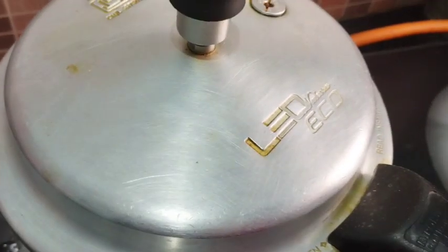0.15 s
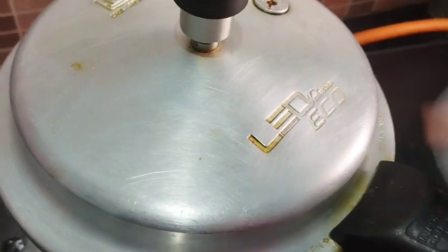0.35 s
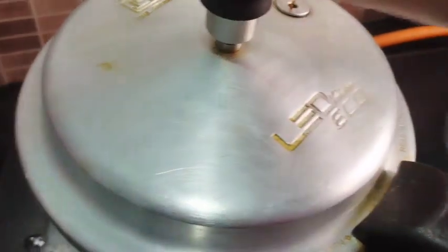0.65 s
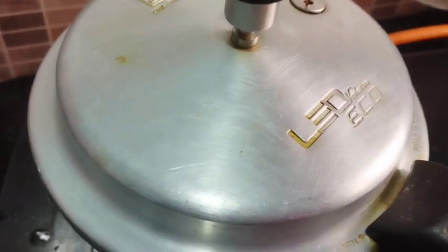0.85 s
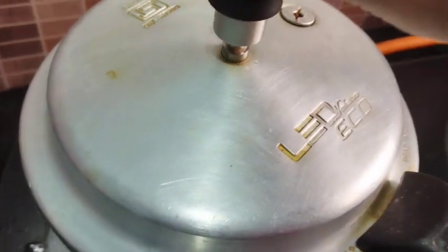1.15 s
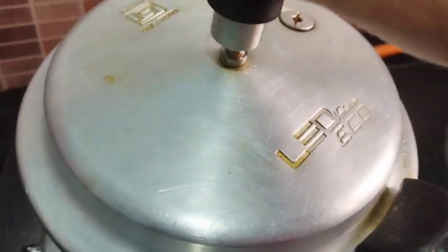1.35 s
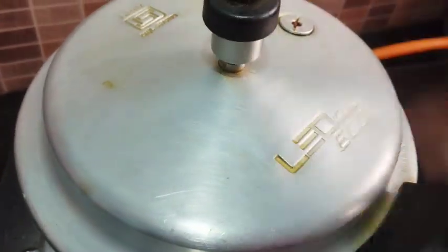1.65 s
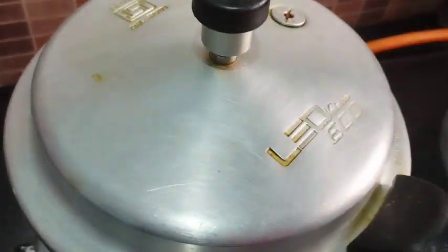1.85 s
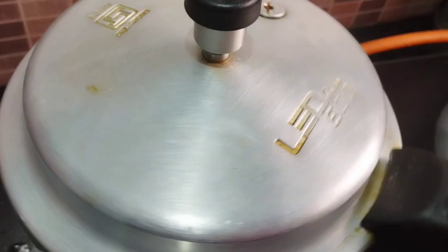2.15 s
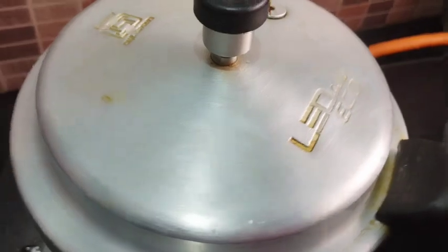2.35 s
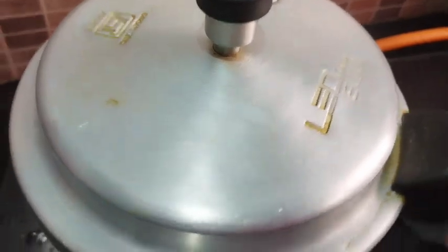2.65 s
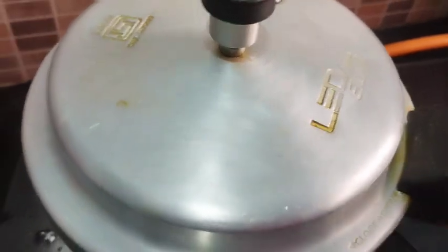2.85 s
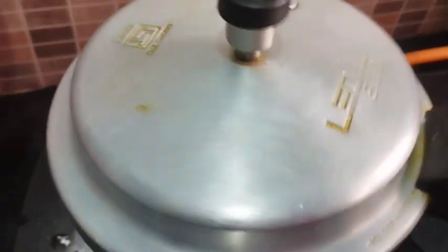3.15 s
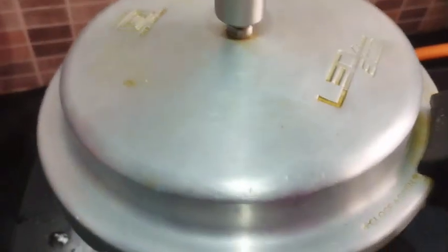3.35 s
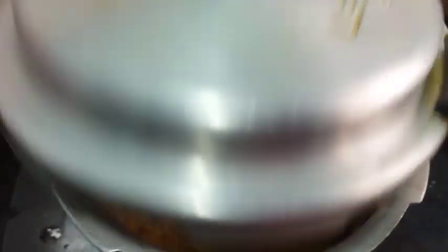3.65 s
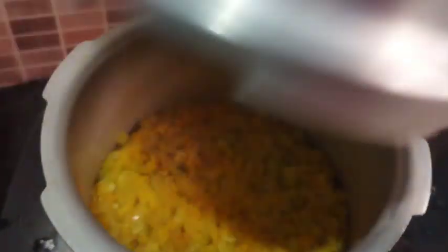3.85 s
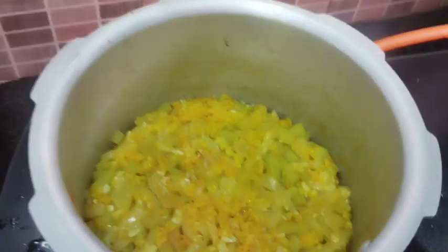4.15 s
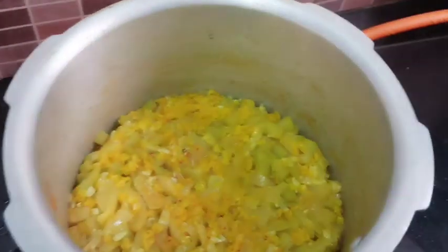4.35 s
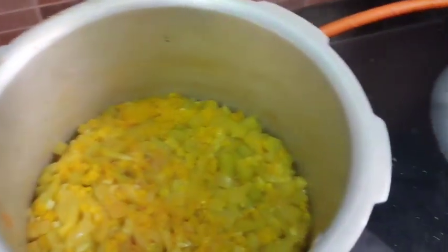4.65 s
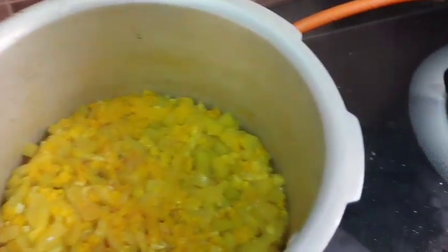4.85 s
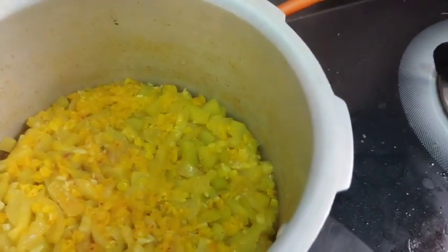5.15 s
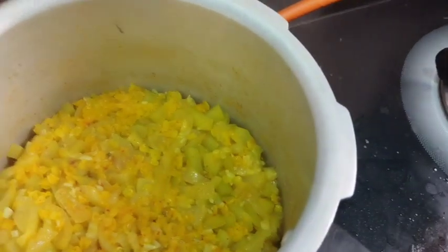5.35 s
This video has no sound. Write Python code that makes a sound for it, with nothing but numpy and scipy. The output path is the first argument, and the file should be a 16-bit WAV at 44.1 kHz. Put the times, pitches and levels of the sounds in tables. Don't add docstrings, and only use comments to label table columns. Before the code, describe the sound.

Close to a pressure cooker in a small tiled kitchen. Near silence, a metallic tick, then a fierce bright hiss of steam that quickly fades and ends in a clink and puff as the weight drops. A quiet gap, then the lid is twisted: ticks, a very loud clanging bang with a low thump, short rubbery groans and more knocks. After it lifts off, only tiny ticks and soft spoon clinks remain. Phone-like sound, slightly clipped.

```python
import sys
import numpy as np
from scipy import signal
from scipy.fft import rfft, irfft
from scipy.io import wavfile
from scipy.ndimage import uniform_filter1d

SR = 44100
rng = np.random.default_rng(int(sys.argv[2]) if len(sys.argv) > 2 else 0)


def master_out(mix):
    frames = np.transpose(np.atleast_2d(mix))
    ceiling = np.clip(frames, -1, 1)
    pcm = np.round(ceiling * 32767).astype(np.int16)
    wavfile.write(sys.argv[1], SR, pcm)


def voltage_ratio(decibels):
    exponent = np.asarray(decibels, float) / 20
    return 10 ** exponent


N = 242991
T = np.arange(N) / SR


def unit(x):
    return x / np.sqrt(np.mean(x ** 2))


def coloured(spectrum):
    hz, db = np.transpose(spectrum)
    f = np.maximum(np.fft.rfftfreq(N, 1 / SR), 1)
    gain = voltage_ratio(np.interp(np.log(f), np.log(hz), db))
    return unit(irfft(rfft(rng.standard_normal(N)) * gain, N))


def band(x, lo_hz, hi_hz):
    sos = signal.butter(2, [lo_hz, min(hi_hz, .45 * SR)], "bandpass", fs=SR, output="sos")
    return signal.sosfilt(sos, x)


def noise_band(lo_hz, hi_hz):
    return unit(band(rng.standard_normal(N), lo_hz, hi_hz))


def walk(rate_hz):
    k = int(SR / rate_hz)
    held = np.repeat(rng.standard_normal(N // k + 1), k)
    return unit(uniform_filter1d(uniform_filter1d(held, k), k)[:N])


def gain_curve(s, db):
    edge = np.clip(np.minimum(T - s[0], s[-1] - T) / .006, 0, 1)
    return voltage_ratio(np.interp(T, s, db)) * edge


def swell(s, rise_s, hold_s, fall_s, db, sag_db=0):
    depth_db = 23
    times = s + np.cumsum([0, rise_s, hold_s, fall_s])
    return gain_curve(times, db - np.array([depth_db, 0, sag_db, sag_db + depth_db]))


def add(out, s, db, t60, hz=None, rise_s=.0003):
    i = int(s * SR)
    t = T[:min(int(1.2 * t60 * SR) + 8, N - i)]
    shape = voltage_ratio(db - 60 * t / t60) * (1 - np.exp(-t / rise_s))
    out[i:i + len(t)] += shape if hz is None else shape * np.sin(2 * np.pi * hz * t)


def resonate(x, hz, t60):
    p = np.exp(2j * np.pi * hz / SR - np.log(1000) / (t60 * SR))
    return signal.lfilter([1], [1, -p], x).imag


def metal_bands(x):
    return np.array([band(x, lo, hi) for lo, hi in [(200, 1300), (1100, 5600), (4600, 15500)]])


def rattle(rate_hz):
    # frequency in Hz, level in dB per Hz.
    metal_spectrum = [(88, -32), (150, -11.5), (321, -3.5), (662, 0), (790, -4.5), (1340, -1), (1420, -6.5),
                      (1980, -5.5), (4160, -11.5), (8070, -7), (16000, -41.5)]
    return [unit(b) for b in metal_bands(coloured(metal_spectrum) * voltage_ratio(2 * walk(rate_hz)))]


def steam_jet():
    # time in seconds, hiss level in dB.
    pressure_curve = [(.85, -50.5), (.864, -28), (.886, -13), (.896, -6.5), (1.03, -10.5), (1.142, -11),
                      (1.32, -17.5), (1.53, -24), (1.6, -55)]
    # frequency in Hz, level in dB per Hz.
    jet_spectrum = [(88, -70.5), (150, -53.5), (193, -30), (275, -33), (821, -27.5), (1080, -27.5),
                    (1480, -21.5), (3770, -20.5), (4650, -20), (5150, -16.5), (5790, -18), (8950, 2),
                    (11700, -19.5), (13200, -18), (16000, -37.5)]
    # resonance in Hz, width in Hz, level re hiss in dB, onset in seconds.
    vent_resonances = [(4150, 220, -25, 1.0), (5100, 800, -20.5, .82), (1500, 450, -35, .9),
                       (2000, 400, -34, 1.05), (2700, 300, -35, .9), (13000, 900, -34, .88)]
    rush_db, rush_exponent, lag_s, vent_db = -21.5, 0.55, 0.03, 1
    puff_hiss_db, puff_rush_db = -13.5, -18

    jet, puff = coloured(jet_spectrum), np.zeros(N)
    rush = band(jet, 100, 5300)
    add(puff, 1.532, 0, 0.11, rise_s=0.0048)
    pressure = gain_curve(*np.transpose(pressure_curve))
    flutter = voltage_ratio(walk(120) + walk(25) / 2)
    hiss = unit(jet - rush) * (pressure + voltage_ratio(puff_hiss_db) * puff) * flutter

    vent = np.zeros(N)
    for hz, width_hz, db, start_s in vent_resonances:
        onset = np.clip((T - start_s) / .06, .1, 1)
        vent += voltage_ratio(db + 0.9 * walk(24)) * noise_band(hz - width_hz / 2, hz + width_hz / 2) * onset

    late = uniform_filter1d(pressure, int(lag_s * SR), origin=int(lag_s * SR / 2) - 1)
    flow = voltage_ratio(rush_db) * np.abs(late) ** rush_exponent * np.clip(pressure / voltage_ratio(-30.5), 0, 1)
    rush = unit(rush) * (flow + voltage_ratio(puff_rush_db) * puff) * voltage_ratio(3.5 * walk(40))
    return hiss + rush + vent * voltage_ratio(vent_db) * (late + pressure) / 2


def vent_whistle():
    # time in seconds, pitch in Hz, level in dB.
    whistle_curve = [(1.03, 1560, -55), (1.114, 1500, -44), (1.158, 1330, -41), (1.212, 1170, -42),
                     (1.25, 950, -47), (1.32, 781, -46), (1.4, 586, -56), (1.462, 520, -53.5),
                     (1.535, 369, -48)]
    s, hz, db = np.transpose(whistle_curve)
    phase = 2 * np.pi * np.cumsum(np.interp(T, s, hz) * (1 + .036 * walk(150))) / SR
    return np.sin(phase) * gain_curve(s, db) * voltage_ratio(2.6 * walk(45))


def seal_leak():
    # start, rise, hold, fall in seconds, level in dB.
    leak_swells = [
        (-.1, 0.067, 0.83, .1, -54),
        (1.503, 0.049, 4.2, .1, -67),
        (2.213, 0.24, .34, 0.41, -53.5),
        (3.778, 0.027, 0.056, 0.13, -58.5),
        (4.166, .01, 0.026, 0.046, -64),
        (5.37, 0.15, .1, .1, -50.5),
    ]
    # frequency in Hz, level in dB per Hz.
    seal_spectrum = [(1180, -43), (2000, -13.5), (2690, -19), (4300, -15.5), (7510, -5.5), (8550, 2.5),
                     (10700, -11.5), (15100, -19), (16000, -20)]
    # Start, rise, hold, fall in seconds, level in dB.
    thin_jet = (0.82, 0.07, 0.0546, 0.0653, -30.5)
    leak = coloured(seal_spectrum) * sum(swell(*row) for row in leak_swells) * voltage_ratio(walk(28))
    return leak + noise_band(4700, 5500) * swell(*thin_jet)


def metal_modes(drive):
    # end in seconds of the time this object is struck, modes as rows of frequency in Hz, level in
    # dB, t60 in seconds.
    struck_modes = [
        (1.0, [(401, -11.5, 0.041), (765, -4.5, 0.05), (1150, -6.5, 0.04), (1900, 0, 0.041), (2830, 3, .04), (3295, -7.5, .07), (6100, 2, 0.06), (6900, 3, .07)]),
        (2.0, [(616, -8, 0.046), (927, -1.5, 0.057), (1003, 1, 0.1), (1460, 1, .06), (2090, 8, 0.08), (2820, 8.5, 0.055), (3500, -4, .08), (4464, 0, 0.15), (5900, 12, 0.11), (7740, -6.5, 0.25)]),
        (2.7, [(1230, -8, 0.07), (2110, -7, 0.1), (2567, -10, 0.1), (4420, 0, 0.066), (5500, -4.5, 0.03)]),
        (3.0, [(229.3, -13, 0.8), (950, -8, .08), (539, -14.5, 0.16), (1963, -9, 0.094), (2147, -12.5, 0.12), (2827, -4.5, 0.096), (3295, -10.5, 0.1), (4430, -9, 0.2), (6460, 2, 0.13), (7000, -4, .14), (12400, -8.5, .16)]),
                    (3.5, [(900, -8.5, 0.06), (1310, -15.5, 0.14), (1540, -3, 0.06), (2080, -14, 0.037), (2850, -9, 0.15), (3270, -7, 0.042), (4400, -11.5, 0.18)]),
        (4.0, [(1130, -4.5, 0.074), (1563, -8.5, 0.2), (1976, -5, 0.22), (2140, 2.5, 0.092), (3180, -1, 0.11), (3900, -18, 0.058), (4330, -9, 0.22), (6180, -7.5, 0.16)]),
        (5.001, [(2008, 3.5, 0.13), (2190, 8, 0.098), (3400, 0.5, 0.074), (2732, 8, 0.21), (4406, 2, 0.14), (6400, 10, 0.099), (7860, 4.5, 0.1), (8940, 1.5, .1), (9600, 7, .08), (11000, 9, 0.08), (12000, 11, 0.085)]),
        (5.6, [(325.5, -8.5, 0.28), (747, -3.5, 0.072), (920, 3.5, 0.064), (1150, 5, 0.066), (1770, 3, 0.12), (2330, 5, 0.12), (2605, 4, 0.1), (2780, 5, 0.12), (3120, 4.5, 0.1), (3410, -4, .1), (5170, 0, 0.11), (6770, -1, .08), (9640, 2, 0.06)]),
    ]
    neighbours, split = ((-2, .35), (-1, .5), (0, 1), (1, .6), (2, .35)), 0.012
    ring, since_s = np.zeros(N), 0
    for until_s, modes in struck_modes:
        i, j = int(since_s * SR), int(until_s * SR)
        part = np.append(drive[i:j], np.zeros(SR // 2))[:N - i]
        for hz, db, t60 in modes:
            for offset, share in neighbours:
                detune = 1 + split * (offset + rng.uniform(-0.44, 0.19) * share)
                ring[i:i + len(part)] += voltage_ratio(db - 2.5) * resonate(part, hz * detune, t60 * share)
        since_s = until_s
    return ring * (1 + .3 * walk(170))


def knocks():
    # time in seconds, crack in dB, thud re crack
    # in dB, treble re crack in dB.
    blows = [(0.7732, -16.5, -7.5, 3.5), (0.788, -28.5, 3.5, -1.5), (1.5155, -28.5, -14, 4),
             (1.528, -29, -14, -4), (1.5389, -19.5, -5, 7), (1.5555, -27, -7, 5), (1.571, -30, 0, 0),
             (2.3156, -19, -3.5, 7), (2.333, -30.5, 2.5, -5), (2.5808, -20.5, 3.5, 2), (2.7567, -15, 4, -6),
             (2.768, -6, -3.5, 1.5), (2.7775, -2, -4, 2), (2.791, -13, 1, 10.5), (2.802, -23, 1, 7),
             (2.823, -9, -7, -13), (2.834, -25, 6, 11), (2.85, -17.5, -5, -5.5), (2.879, -29, 4, 3),
             (3.1129, -40.5, -1, -5), (3.2297, -39, -11, -5), (3.24, -31.5, -9, -10),
             (3.2573, -23.5, 7.5, -2.5), (3.2624, -33.5, -4, -6), (3.293, -27.5, -2, 1),
             (3.341, -20.5, -11, -0.5), (3.35, -21, -7, -3), (3.3682, -23, 2.5, -15), (3.378, -31.5, 6, -8),
             (3.568, -9, -1, 0), (3.5727, -20, -3, -2), (3.5838, -17.5, 1.5, -1), (3.599, -29, 3, 3),
             (3.625, -36, -0.5, 4), (3.645, -41, 2.5, -1.5), (4.872, -52, -3, -13.5),
             (4.8793, -31, -8.5, 6.5), (4.883, -38, -2, 1), (4.891, -48, -5, 0), (5.3547, -27.5, -8, -3.5),
             (5.358, -29.5, -12, -1.5), (5.368, -35, -8.5, -11), (5.38, -40.5, -8, -10),
             (5.4214, -27, -10, -9), (5.433, -39, -15, -8), (5.448, -35, -14, -5),
             (5.395, -40, -10, -14), (5.44, -41, -12, -10), (5.461, -38, -10, -6),
                   (5.47, -40, -3, -8), (5.481, -38, -1, -10), (5.492, -40, -8, -7), (5.501, -45, -8, -8)]
    rattle_t60_s, chatter_t60_s, ring_db, strike_db = .145, 0.047, -42.5, 20
    env, click, chatter = np.zeros((3, N)), np.zeros((3, N)), np.zeros(N)
    for s, db, thud_db, treble_db in blows:
        for k, rel_db in enumerate((thud_db, 0, treble_db)):
            add(env[k], s, db + rel_db - 15.0, rattle_t60_s)
            add(env[k], s, db + rel_db - 9, .03)
            click[k, int(s * SR) + 8] += voltage_ratio(db + rel_db - 2.5)
        add(chatter, s, db + ring_db, chatter_t60_s)
    drive = chatter * rng.standard_normal(N) + voltage_ratio(ring_db + strike_db) * click[1]

    peak = np.abs(metal_bands(signal.unit_impulse(512))).max(axis=1)
    clicks = sum(metal_bands(c)[k] / peak[k] for k, c in enumerate(click))
    rattles = (env * rattle(350)).sum(axis=0) + band(clicks, 100, 11000)
    return rattles, metal_modes(drive)


def groans():
    # start in seconds, hold in seconds, pitch in Hz, glide in Hz per second, level in dB.
    gasket_slips = [(2.082, 0.069, 371, 99, -59), (2.217, 0.034, 381, -50, -52),
                    (2.632, 0.065, 584, -150, -33.5), (2.743, 0.0089, 381, 49, -29.5),
                    (3.143, 0.0095, 617, -300, -32), (3.154, 0.032, 612, -400, -49),
                    (3.226, 0.03, 330, -100, -31.5), (3.268, 0.028, 330, 107, -30.5),
                    (3.296, 0.033, 364, 103.5, -33.5), (3.339, 0.012, 393, 401.5, -10.5),
                    (3.39, 0.05, 406.5, -260, -27), (3.455, 0.056, 426, 1, -48)]
    rise_s, fall_s, sag_db = 0.0065, 0.013, 6
    out, waver, slip = np.zeros(N), 1 + 0.0148 * walk(90), voltage_ratio(1.6 * walk(110))
    for s, hold_s, hz, glide, db in gasket_slips:
        phase = 2 * np.pi * np.cumsum((hz + glide * (T - s)) * waver) / SR
        effort = swell(s, rise_s, hold_s, fall_s, db, sag_db)
        out += np.sqrt(2) * slip * effort * (np.sin(phase) + voltage_ratio(-34) * np.sin(3 * phase))
    return out


def rings():
    # time in
    # seconds, peak in dB, pitch in Hz, t60 in seconds.
    pot_rings = [(1.514, -30.5, 368, 0.2), (1.54, -25, 324.7, 0.22), (1.542, -26.5, 380, 0.15),
                 (1.556, -30.5, 271, 0.1), (1.575, -31, 330, .15), (1.6, -36, 289, 0.13),
                 (2.334, -27, 305, 0.11), (2.579, -34, 663, 0.31), (2.77, -12.5, 662, 0.12),
                 (2.799, -25, 619, 0.17), (3.374, -12.5, 360, 0.043), (3.567, -10, 505, 0.067),
                 (3.592, -21, 501.5, 0.17), (3.573, -11, 419, 0.066), (3.614, -26, 440.5, 0.17),
                 (2.318, -32, 490, 0.079), (2.33, -37, 663, 0.095), (3.255, -50, 4500, .25),
                 (3.355, -46, 4420, 0.2), (3.569, -34.5, 4400, 0.22), (3.575, -33.5, 1570, 0.25)]
    # time in seconds, peak in dB, pitch in Hz, t60 in seconds.
    stove_thumps = [(2.317, -30.5, 196, 0.093), (2.582, -25.5, 197, 0.15), (2.606, -29, 165.4, 0.095),
                    (2.763, -0.5, 103.5, 0.12), (2.774, -20, 99.1, 0.4), (2.817, -10, 99, 0.056),
                    (2.895, -17.5, 117.5, 0.14), (3.342, -34, 130, 0.29), (5.355, -34.5, 106.4, 1),
                    (5.422, -36, 108.3, 0.27), (5.449, -32, 103.4, 0.3), (5.479, -38, 104, 0.23)]
    # time in seconds, peak in dB, pitch in Hz, t60 in seconds.
    thin_rings = [(0.001, -55.5, 6000, 0.53), (.012, -63, 2790, 0.38), (1.513, -32, 2090, .15),
                  (1.535, -34, 1900, 0.098), (1.555, -33.5, 1000, 0.17), (2.335, -52, 2100, 0.13),
                  (2.6, -46.5, 4600, .1), (0.66, -47.5, 11200, .15), (1.548, -37.5, 4420, 0.3),
                  (3.239, -26.5, 2080, 0.036), (2.82, -20, 1990, 0.079), (4.435, -68.5, 10770, 0.12),
                  (4.484, -52, 11100, 0.097), (4.516, -45.5, 10900, 0.11), (4.516, -52, 12000, 0.18),
                  (4.52, -59.5, 15200, 0.2), (4.56, -55, 11500, 0.15), (4.562, -57, 9900, 0.14),
                  (4.59, -56, 2900, 0.1), (4.582, -55, 3300, 0.14), (4.775, -64, 6550, 0.16),
                  (4.85, -53, 2740, 0.14), (4.2, -62, 2050, 0.22), (4.1, -56.5, 6500, .08),
                  (2.8, -36, 4500, .3), (2.86, -40, 4400, .3), (2.835, -33, 2300, 0.23),
                  (2.86, -39, 2200, 0.25), (4.88, -44, 1900, 0.18), (4.88, -50, 4410, 0.16),
                  (4.88, -46, 5800, .17), (3.575, -34, 2150, 0.18), (3.58, -36, 1800, .22),
                  (5.36, -41.5, 325, 0.37), (3.6, -42, 2900, 0.065), (5.0225, -52, 7800, 0.035),
                  (5.475, -50.5, 8100, .3), (5.47, -66, 4000, .2), (3.35, -34, 4500, 0.1),
                  (3.26, -34, 2700, 0.056), (5.47, -52.5, 6200, 0.26)]
    out, tinkle = np.zeros(N), np.zeros(N)
    for target, table, rise_s in ((out, pot_rings, .003), (out, stove_thumps, .006),
                                  (tinkle, thin_rings, .0012)):
        for s, db, hz, t60 in table:
            add(target, s, db, t60, hz, rise_s)
    return out + tinkle * (1 + .9 * walk(330))


def ticks():
    # time in seconds, peak in dB, centre in Hz.
    droplets = [(0.335, -45, 3120), (.357, -44, 3100), (.357, -48, 4800), (2.2854, -34, 1190),
                (2.2732, -44, 2500), (2.517, -42, 4500), (4.1702, -32, 6000), (2.2276, -31, 7800),
                (2.2284, -40, 3010), (2.2732, -42, 4470), (2.286, -37, 4100), (2.2854, -43, 12000),
                (2.4494, -40, 8520), (2.316, -17.5, 13000), (2.517, -27, 8900), (2.5167, -40, 13000),
                (2.5173, -41, 2930), (3.514, -47, 3360), (3.5144, -45.5, 8500), (3.735, -43.5, 3260),
                (3.735, -45, 5260), (3.735, -47.5, 9500), (3.9295, -47, 5470), (3.9295, -50, 3910),
                (3.95, -44, 5480), (3.971, -41.5, 5600), (4.015, -41, 5400), (4.0357, -49, 5300),
                (4.17, -29.5, 2200), (4.17, -38, 2880), (4.172, -28, 1150), (4.17, -21.5, 8000),
                (4.417, -46, 8230), (4.485, -50.5, 3180), (4.485, -40.5, 8170), (4.502, -50, 5500),
                (4.502, -51.5, 3200), (4.549, -51, 3000), (4.795, -52, 3100), (4.417, -50, 5780),
                (4.487, -52, 5530), (4.5204, -47.5, 3000), (4.5208, -31.5, 9000), (4.5597, -42, 8580),
                (4.577, -46, 8700)]
    width, t60_s = 0.26, 0.0091
    out = np.zeros(N)
    for s, db, hz in droplets:
        i = int(s * SR)
        burst = band(rng.standard_normal(2048), hz * (1 - width / 2), hz * (1 + width / 2))
        out[i:i + 2048] += unit(burst) * voltage_ratio(db - 4.0 - 60 * T[:2048] / t60_s)
    return out


def rubbing():
    # contact in seconds, run-up in seconds, level in dB, dull and treble parts re level in dB.
    run_ups = [(2.296, 0.1, -43, -1.5, -1), (3.149, 0.051, -49.5, 7.5, -3), (3.8, 0.043, -56, 9.5, 0),
               (4.877, 0.04, -43.5, -8, -3.5)]
    # start in seconds, t60 in seconds, level in dB, dull and treble parts re level in dB.
    drags = [(2.38, 3.5, -55.5, 3, -12), (2.589, 0.45, -36.5, -1, 3), (3.113, 0.71, -55, 9.5, -0.5),
             (3.23, 0.22, -38, 4, 0), (3.258, 0.25, -43, -4, 2), (3.351, 0.19, -30, 7, 0.5),
             (3.8, 0.9, -48, 2, -0.5), (5.372, .5, -50, 5, -9), (5.43, 0.32, -50, 9, -6),
             (5.459, 1.5, -54, 8, -8)]
    rub = np.zeros((3, N))
    for s, run_s, db, dull_db, treble_db in run_ups:
        rub += np.outer(voltage_ratio(np.array([dull_db, 0, treble_db])), swell(s - run_s, run_s, 0, 0.0072, db))
    for s, t60, db, dull_db, treble_db in drags:
        for part, rel_db in zip(rub, (dull_db, 0, treble_db)):
            add(part, s, db + rel_db, t60, rise_s=0.0037)
    return voltage_ratio(-3.0) * (rub * rattle(300)).sum(axis=0)


def pot_rumble():
    # time in seconds, level in dB, t60 in seconds.
    rocks = [(0.884, -40.5, 0.28), (1.52, -53, 0.41), (2.315, -51.5, 0.62), (2.585, -37.5, 0.36),
             (2.755, -21.5, 0.67), (2.9, -46, 0.84), (3.146, -50, 0.74), (3.26, -45.5, 1),
             (3.565, -47.5, 0.53)]
    rock = np.zeros(N)
    for s, db, t60 in rocks:
        add(rock, s, db, t60, rise_s=0.0068)
    return noise_band(26, 110) * rock


def hollow_pot():
    # start, rise, hold, fall in seconds, level in dB.
    air_swells = [(3.755, 0.059, 0.17, 0.1, -58.5), (4.038, 0.051, .005, .04, -65.5)]
    return noise_band(498, 660) * sum(swell(*row) for row in air_swells)


def kitchen():
    # frequency in Hz, level in dB per Hz.
    house_spectrum = [(15, -31.5), (25, -0.5), (40, -12.5), (62, -15), (80, -21.5), (105, -5), (153, -8.5),
                      (212, -22.5), (427, -20), (545, -24), (1100, -27), (2110, -34.5), (9320, -42),
                      (16000, -58)]
    # time in seconds, murmur level in dB.
    murmur_curve = [(0, 3), (.8, 2), (1.8, 1), (3.9, 0), (5.51, 0.5)]
    # start in seconds, end in seconds, pitch in Hz, level in dB.
    machine_drones = [(-4, 1.3, 189, -65.5), (4, 4.5, 190, -63.5), (4, 5.3, 155, -57.5),
                      (4.5, 5.3, 83, -59), (2, 4.9, 98, -59.5)]
    out = coloured(house_spectrum) * voltage_ratio(-55.5 + np.interp(T, *np.transpose(murmur_curve)))
    for start_s, end_s, hz, db in machine_drones:
        phase = 2 * np.pi * hz * np.cumsum(1 + .008 * walk(6)) / SR
        out += np.sin(phase) * gain_curve([start_s, end_s], [db, db]) * voltage_ratio(2.3 * walk(1.4))
    return out


def room(x):
    t60_s, wet_db = .3, -8.5
    t = T[:int(.6 * SR)]
    low = band(rng.standard_normal(len(t)), 270, 3800) * voltage_ratio(-60 * t / t60_s)
    high = band(rng.standard_normal(len(t)), 3300, 21000) * voltage_ratio(-60 * t / (0.78 * t60_s))
    tail = (low + high) * np.clip(t / 0.0044, 0, 1)
    return x + voltage_ratio(wet_db) * signal.fftconvolve(x, tail / np.sqrt(np.sum(tail ** 2)))[:N]


def scene():
    tone_wet = .4
    steam = steam_jet() + vent_whistle() + seal_leak()
    rattles, modes = knocks()
    tones = modes + rings() + ticks()
    friction = rubbing() + pot_rumble() + hollow_pot()
    echoing = room(steam + rattles + tone_wet * tones + friction)
    return (echoing + (1 - tone_wet) * tones + groans() + kitchen())[None]


def top_cut(x):
    return signal.sosfilt(signal.butter(12, 16490, fs=SR, output="sos"), x)


def record(dry):
    top = .83
    cut = signal.ellip(10, .3, 60, 16000, fs=SR, output="sos")
    mix = signal.sosfilt(cut, np.clip(dry, -top, top))
    return top_cut(mix)


dry = scene()
out = record(dry)
master_out(out)
```